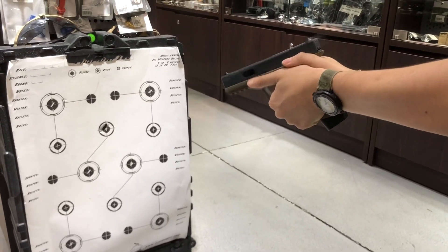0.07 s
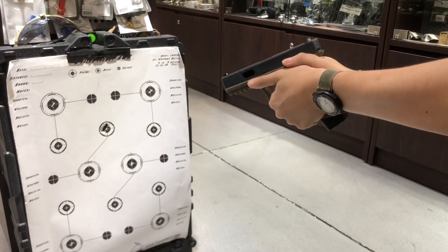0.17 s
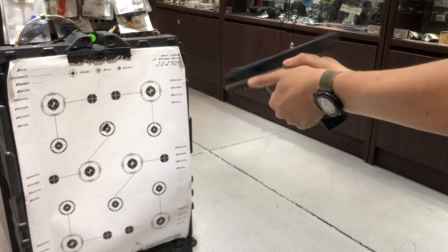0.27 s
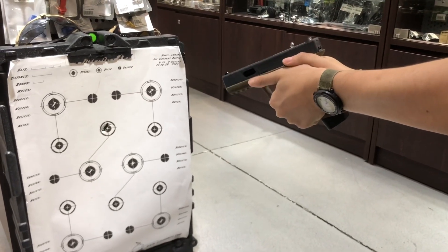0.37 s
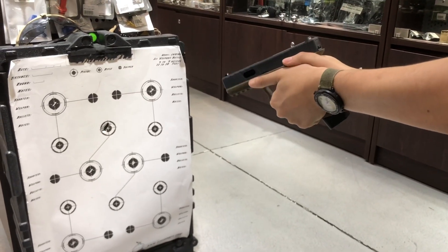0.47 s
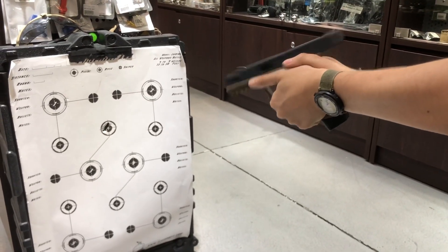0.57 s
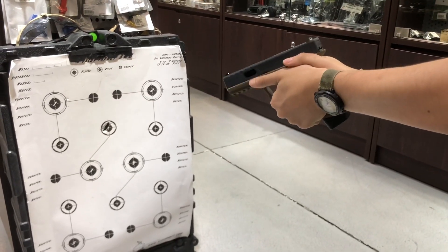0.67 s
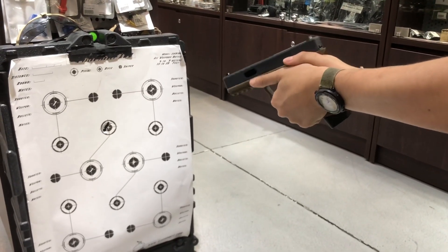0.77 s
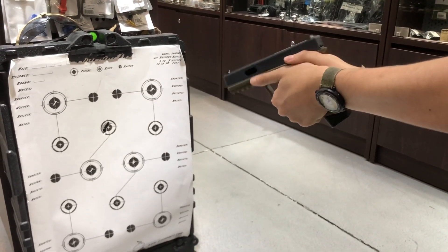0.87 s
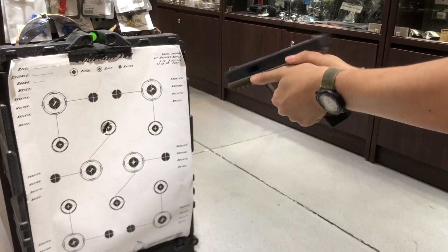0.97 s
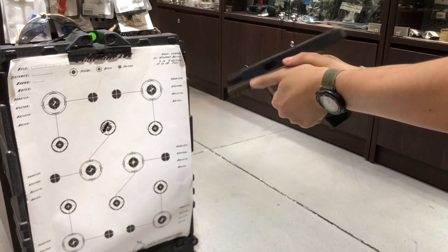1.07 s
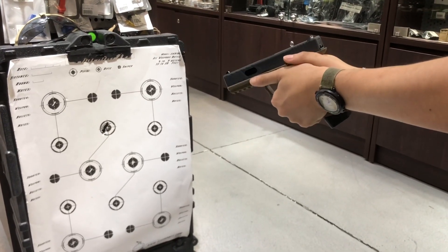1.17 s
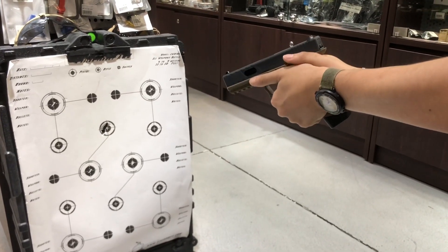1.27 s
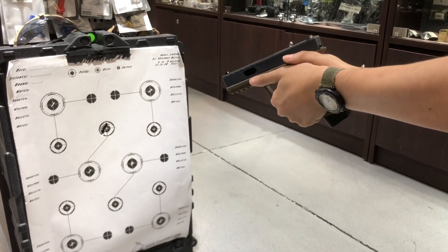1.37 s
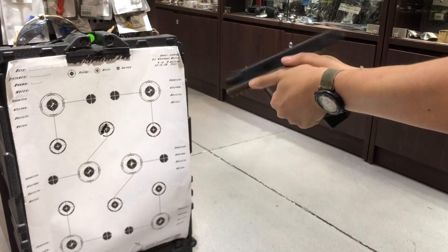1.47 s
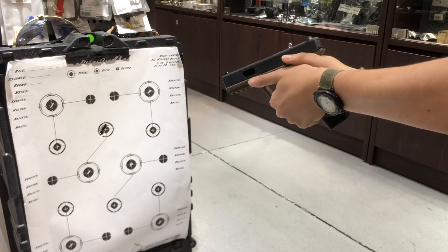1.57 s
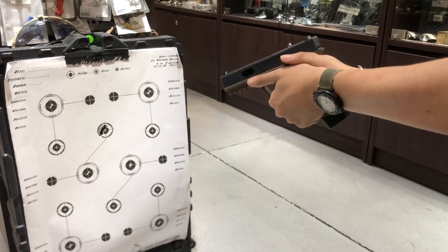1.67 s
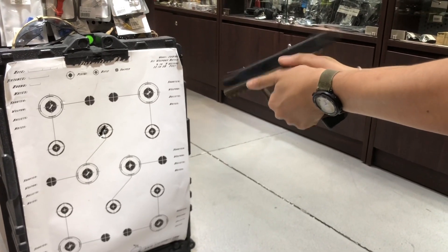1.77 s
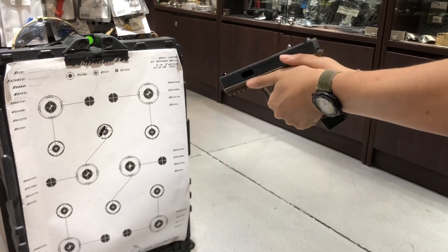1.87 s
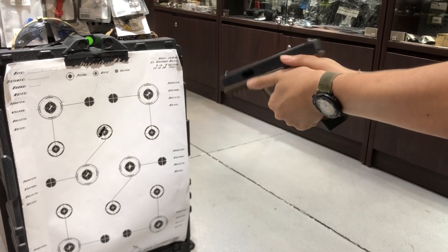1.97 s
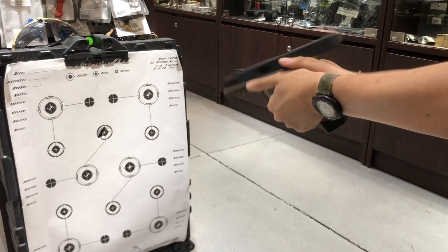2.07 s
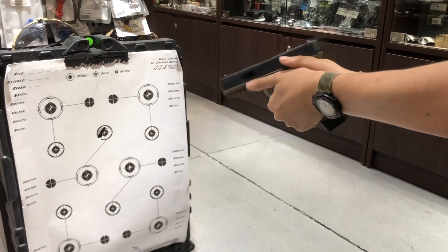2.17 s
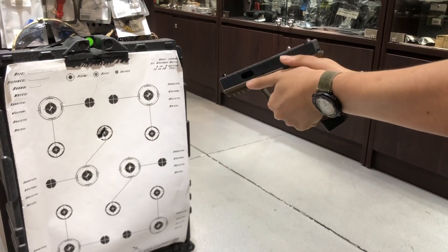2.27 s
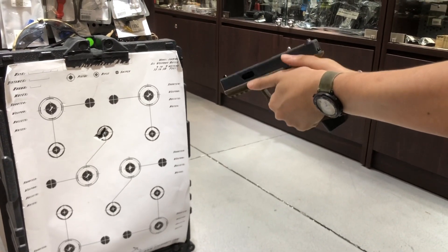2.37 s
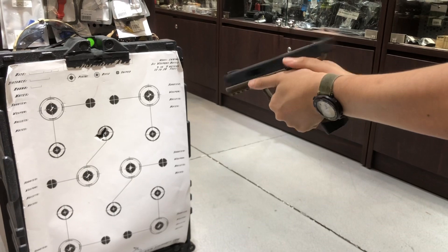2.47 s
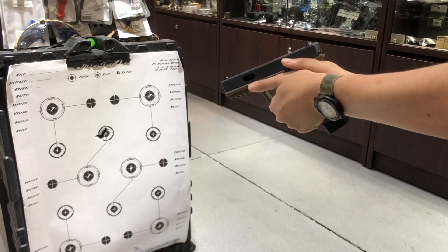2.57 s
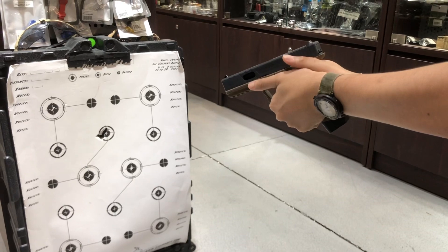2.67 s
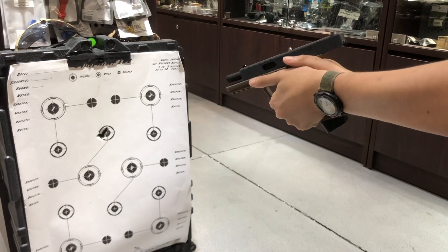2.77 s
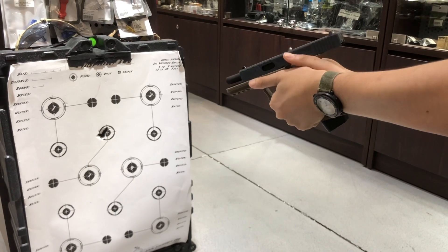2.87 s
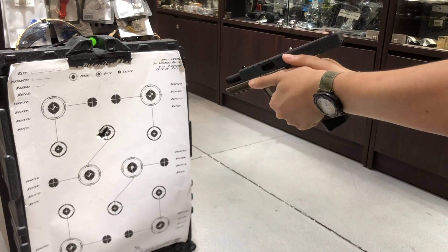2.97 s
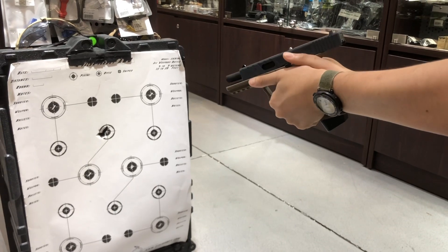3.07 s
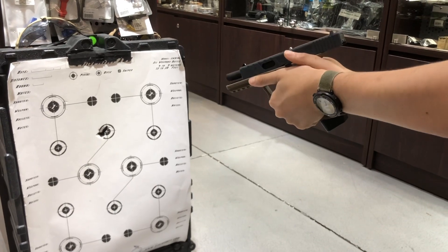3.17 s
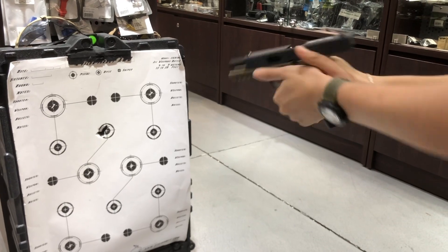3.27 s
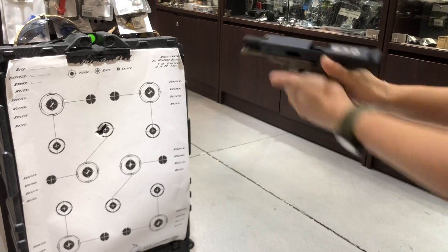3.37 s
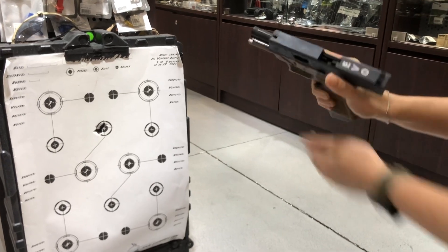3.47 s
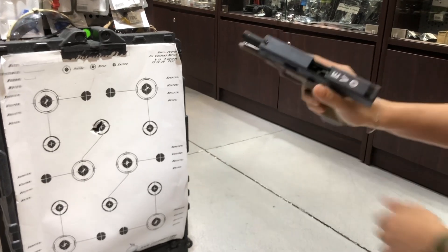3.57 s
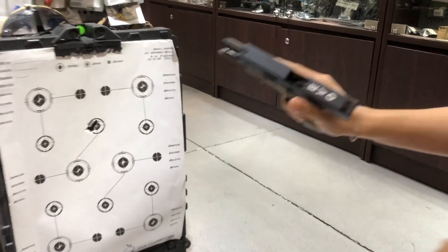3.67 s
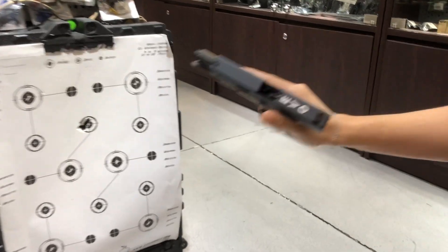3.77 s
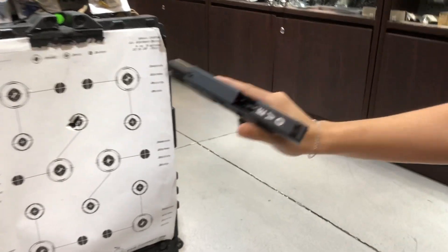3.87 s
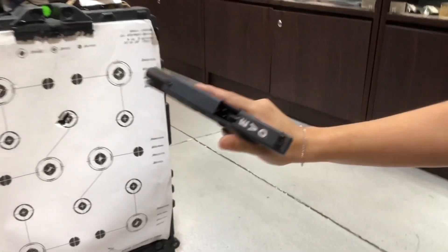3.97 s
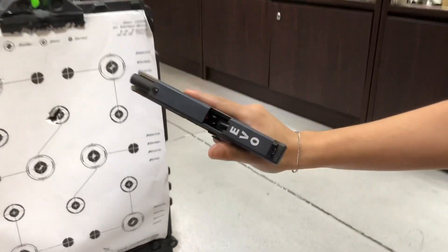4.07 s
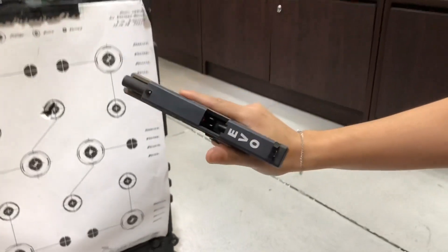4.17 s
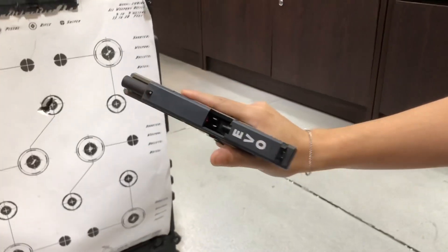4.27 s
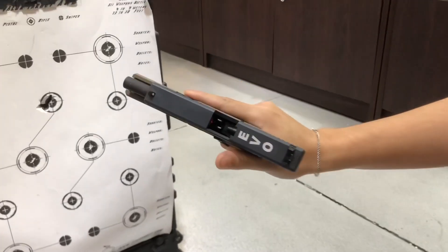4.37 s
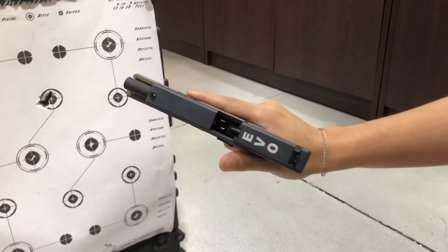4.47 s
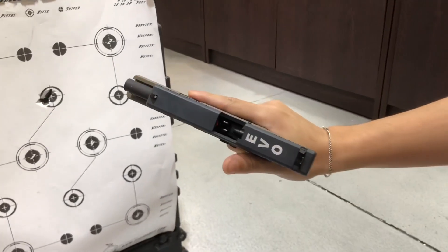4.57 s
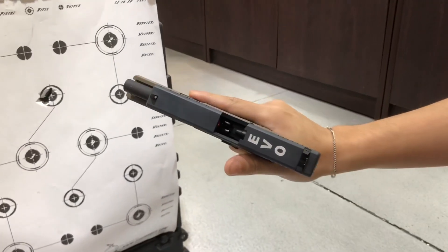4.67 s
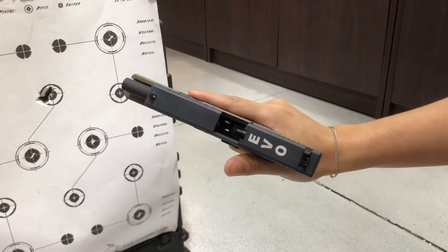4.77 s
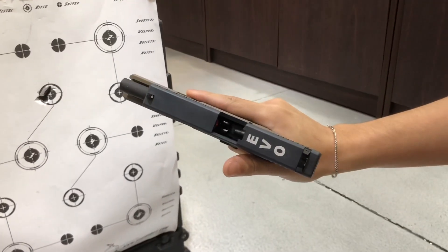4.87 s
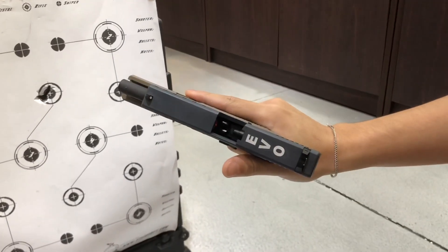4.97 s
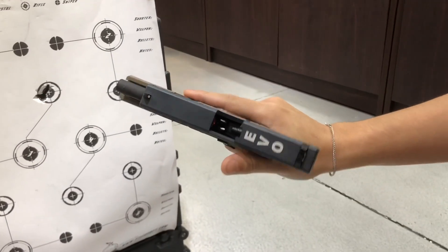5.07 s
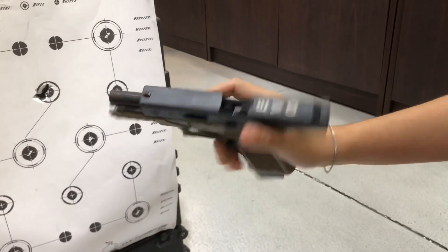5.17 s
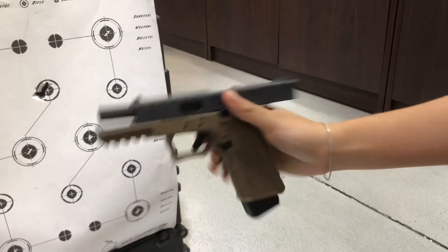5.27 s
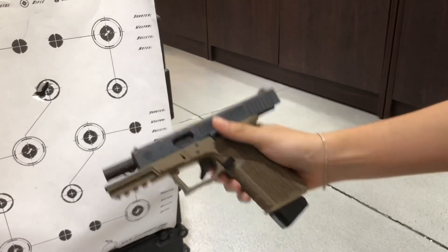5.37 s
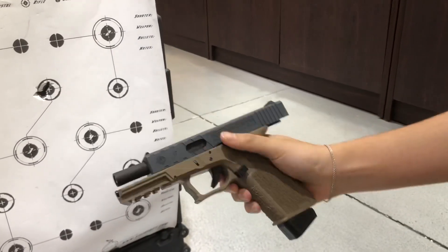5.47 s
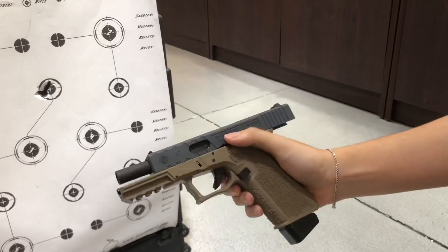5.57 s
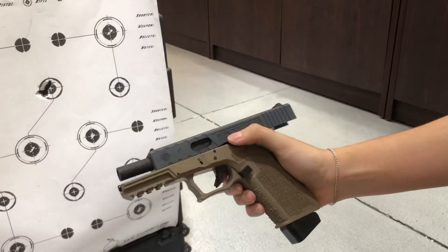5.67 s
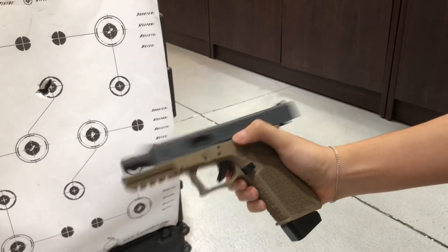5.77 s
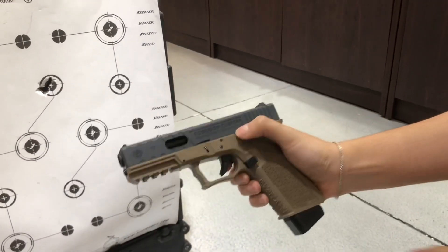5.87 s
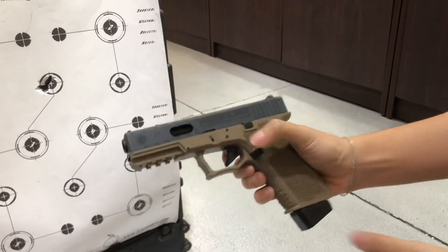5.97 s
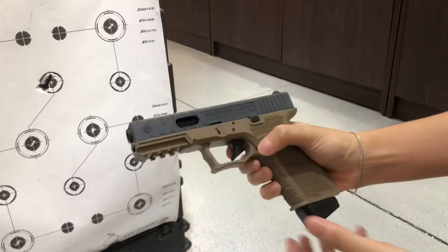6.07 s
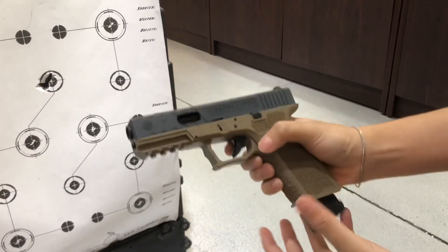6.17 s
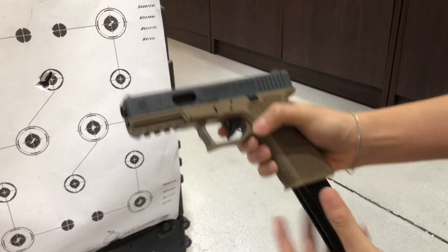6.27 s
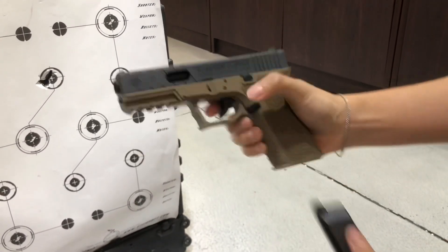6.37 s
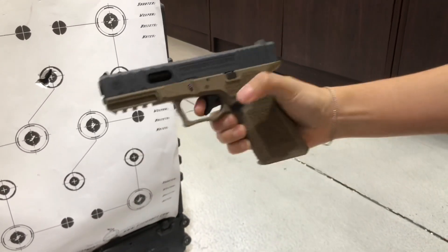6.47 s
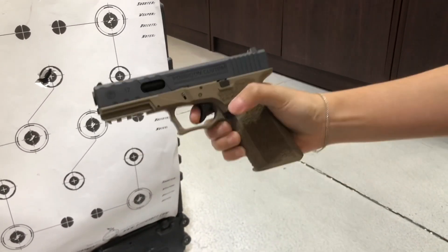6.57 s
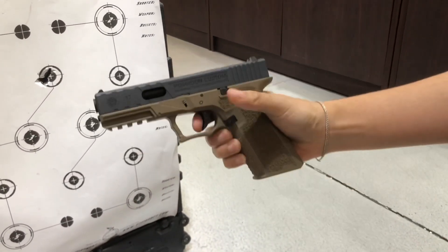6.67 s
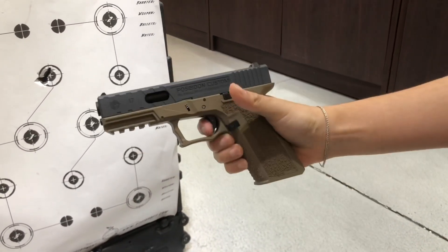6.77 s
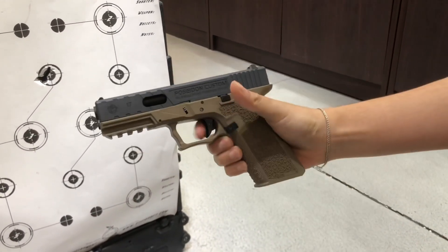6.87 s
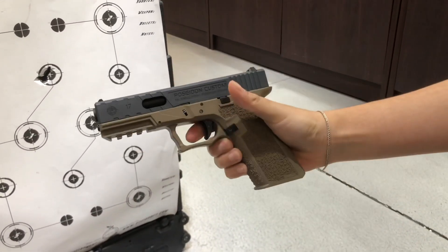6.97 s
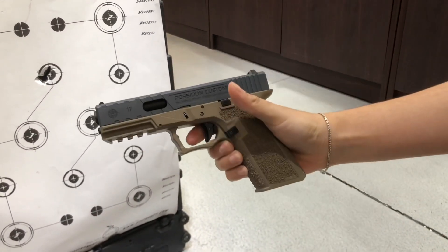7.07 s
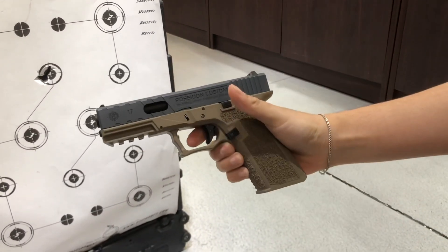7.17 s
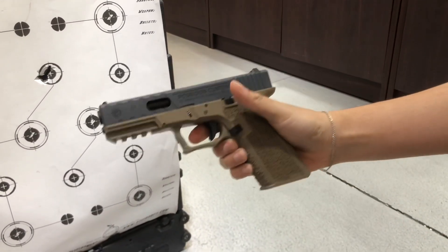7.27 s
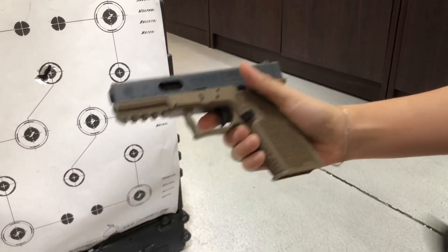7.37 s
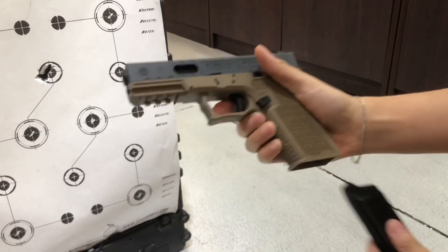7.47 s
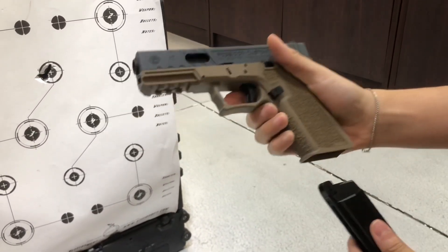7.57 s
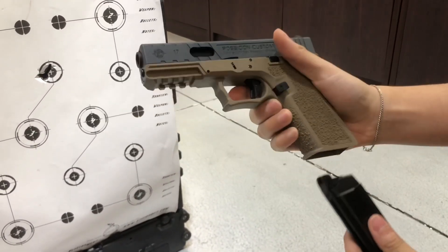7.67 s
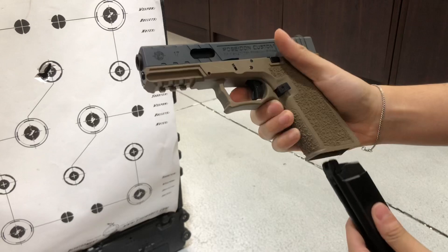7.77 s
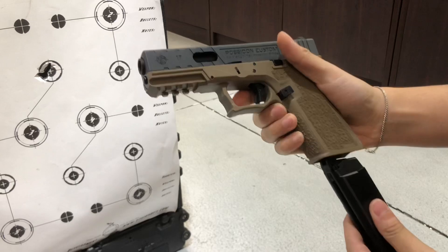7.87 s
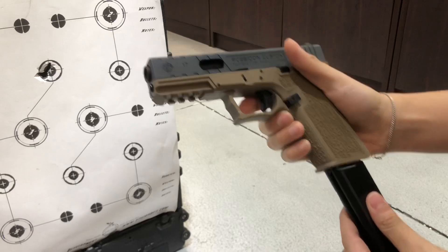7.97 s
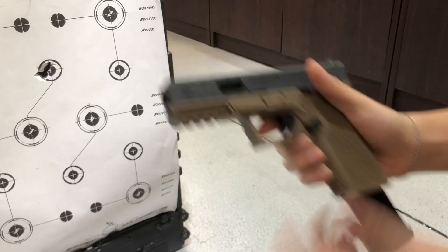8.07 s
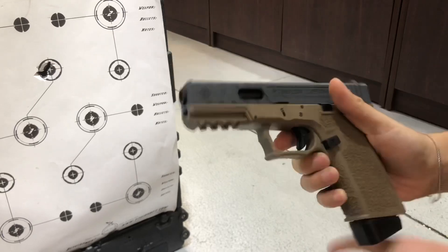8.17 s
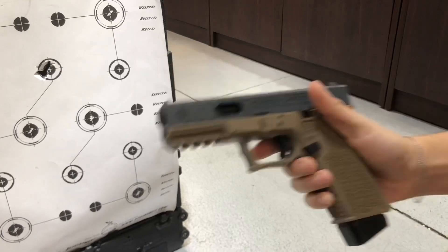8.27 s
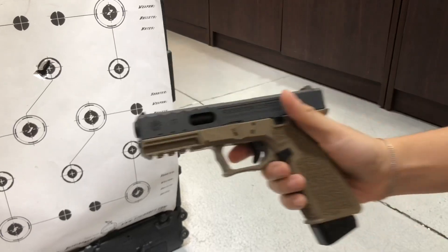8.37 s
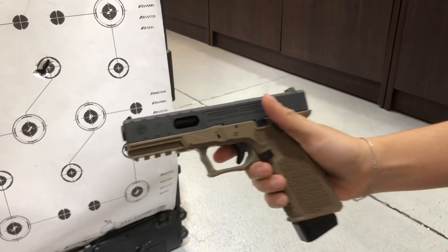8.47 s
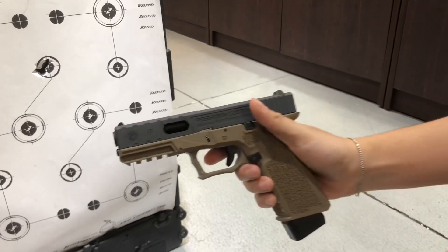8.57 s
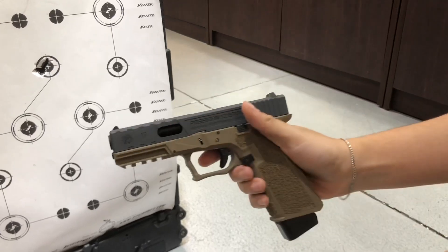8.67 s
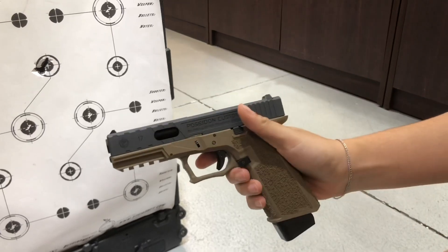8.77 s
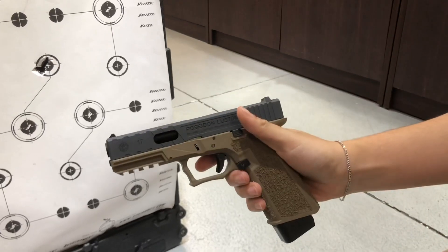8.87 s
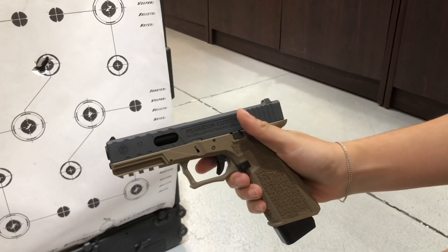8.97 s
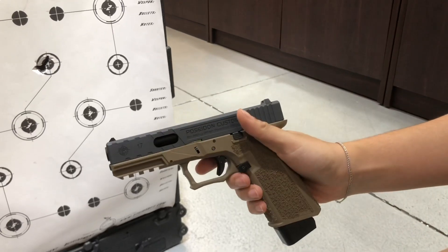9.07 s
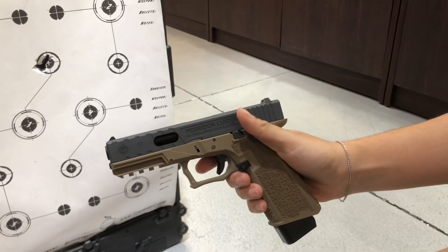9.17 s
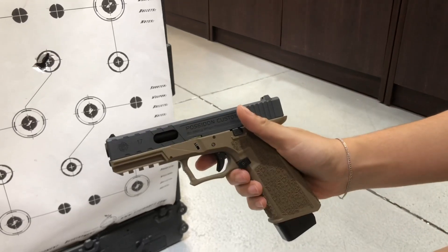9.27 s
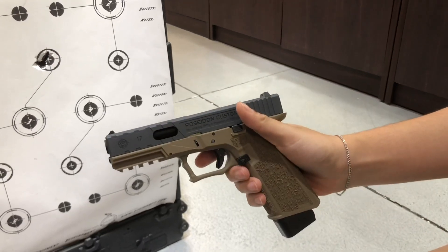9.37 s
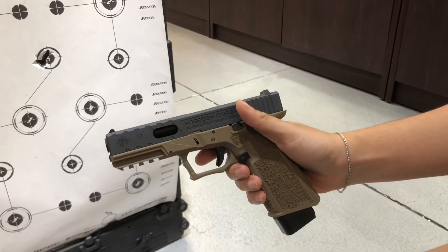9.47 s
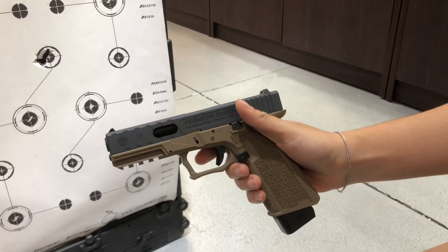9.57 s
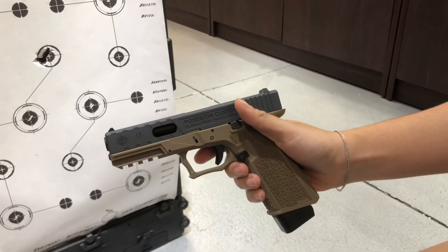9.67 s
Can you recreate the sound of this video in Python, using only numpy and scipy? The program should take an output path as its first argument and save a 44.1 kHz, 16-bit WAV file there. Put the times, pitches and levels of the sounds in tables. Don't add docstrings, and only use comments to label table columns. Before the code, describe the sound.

Very close to a phone microphone in a shop, a gas airsoft pistol fires eighteen rapid, uneven shots, each a crack, pellet knock, metallic slide slap and puff buffeting the microphone. Fan hum returns afterwards. Small clicks lead to a loud slide release, then a magazine drops free and another is pushed in with a double clack.

```python
import sys
import numpy as np
from scipy import signal
from scipy.fft import rfft, irfft, next_fast_len
from scipy.io import wavfile
from scipy.ndimage import uniform_filter1d

SR = 44100
rng = np.random.default_rng(int(sys.argv[2]) if len(sys.argv) > 2 else 0)


def output_pcm(signal):
    pcm = np.clip(np.atleast_2d(signal).T, -1, 1) * 32767
    wavfile.write(sys.argv[1], SR, np.round(pcm).astype(np.int16))


def magnitude_from_level(level_db):
    exponent = np.asarray(level_db, float) / 20
    return 10 ** exponent


N = 429087

# (time [s], strength [dB])
DRAUGHT = [(0, 2), (2.9, -2), (3.6, -1.5), (4.1, 1), (4.8, 1.5), (5.6, 1), (6.6, -1.5), (7.5, -.5),
           (8.4, .5), (9.1, 0), (9.73, 0)]
# (frequency [Hz], density [dB per Hz])
RUMBLE = [(13, -42), (22, -4.5), (32, -3.5), (49, 7), (74, -10), (143, -3.5), (180, -8.5), (261, -0.5),
          (436, -12), (484, -8), (568, -14.5), (666, -9.5), (767, -17.5), (1090, -18.5), (1500, -25),
          (1950, -48.5), (3300, -120)]
# (frequency [Hz], density [dB per Hz])
HISS = [(470, -30), (800, -3.5), (1110, -18.5), (1510, -4.5), (1800, -8), (2490, -5.5), (3860, -14.5),
        (4830, -16.5), (5330, -18), (15800, -30)]
# (frequency [Hz], t60 [s])
SHOP = [(150, 0.51), (1000, 0.29), (5500, 0.27), (10000, 0.22), (15500, 0.17)]
# (frequency [Hz], level sent back [dB])
WALLS = [(300, -5), (1500, 2), (5000, 1.5), (10000, 4), (15400, 6.5)]
# (time [s], length [s], start [Hz], end [Hz], level [dB])
SQUEAKS = [
    (4.865, .12, 1492, 1490, -52),
    (6.397, .05, 6300, 5400, -46),
    (6.45, .07, 6400, 5500, -65),
]
# (time [s], length [s], start level [dB], end level [dB], dullness [dB])
SCRAPES = [
    (1.249, 0.017, -43, -41.5, 7),
    (5.01, 0.047, -39, -46.5, 9.5),
    (5.155, 0.15, -56, -56, 0),
    (6.135, .14, -50, -42, -5),
    (6.682, 0.024, -53, -43, 11),
    (7.972, .093, -58, -29.5, 0),
    (8.25, 0.22, -57.5, -54.5, 1.5),
]
# (time [s], level [dB], dullness [dB], length [s])
CLICKS = [(2.611, -33, 3.5, 0.0048), (2.655, -50, -3.5, 0.005), (2.883, -49.5, 12.5, .0031),
          (3.171, -50.5, 0.5, 0.0057), (3.328, -51, 7, .0033), (3.385, -44.5, 0.5, .005),
          (3.4, -52, 12, .0055), (5.175, -44, 11, 0.0042), (5.212, -42.5, 5, 0.0028),
          (5.228, -40.5, 13, .004), (5.268, -35.5, 5, .012), (5.279, -30.5, 3.5, 0.0037),
          (5.298, -36.5, 8, .0025), (5.354, -38.5, 15.5, .0056), (5.692, -47.5, 3.5, .004),
          (5.72, -54, 5, .0053), (5.877, -34.5, -2, .0051), (6.118, -38.5, 9.5, 0.0038),
          (6.128, -30.5, 5, 0.0044), (6.159, -39, 12, .0032), (6.18, -43.5, 5, .0044),
          (6.28, -46.5, 1.5, .0044), (6.446, -39, 9.5, 0.0049), (6.69, -40, 15, .0034),
          (6.829, -38.5, 8, .0046), (7.91, -37, 8, .0058), (7.958, -33, 8, .0098),
          (7.992, -31, 10.5, 0.0051), (8.02, -32.5, 10, 0.013), (8.975, -51, 5, .0037)]
# (time [s], level [dB], dullness [dB], length [s], echo [dB])
CLACKS = [
    (5.7403, -10, -7, .003, -16),
    (5.7606, -10, -10, .0018, -12),
    (5.7638, -14, 0, .004, -10),
    (5.7683, -14, -12, .0045, -6),
    (6.7068, -22, 4, .003, -9),
    (6.709, -12, 2, .0042, -7),
    (8.0612, -14, -3, .006, -13),
    (8.068, -17, 0, .006, -13),
    (8.0868, -10, -2, .0045, -8),
]
# (time [s], frequency [Hz], level
# [dB], t60 [s])
RINGS = [(2.612, 1300, -38, .1), (5.229, 3500, -29, .04), (5.275, 3100, -29, .03), (5.298, 1900, -31, .025),
         (5.741, 4400, -14, .02), (6.13, 2900, -29, .025), (6.18, 3000, -39, .04), (6.447, 2000, -37, .025),
         (5.354, 1200, -33, .03), (5.764, 2800, -13, .02), (5.7685, 15300, -12, .022),
         (5.786, 15300, -25, .14), (5.785, 9490, -29, .1), (6.709, 1050, -19, .03), (6.709, 1650, -18, .03),
         (6.725, 13800, -28, .04), (7.96, 930, -31, .04), (8.027, 900, -31, .04), (8.04, 750, -36, .05),
         (8.062, 3450, -10, .04), (8.088, 3300, -12, .035), (8.105, 3300, -24, .1), (8.088, 2000, -17, .03),
         (8.125, 2050, -27, .16), (8.152, 3800, -36, .04)]
# (pop time [s], pop level [dB], buffet level [dB])
POPS = [(0.0615, -11.5, -42), (0.2235, -11, -43.5), (0.386, -12, -35.5), (0.525, -0.5, -17),
        (0.6847, -21.5, -26.5), (0.786, -1, -17.5), (0.9054, 0, -11.5), (1.0421, -12.5, -23),
        (1.2732, -6.5, -27), (1.44, -12, -14), (1.5835, 2, -17.5), (1.743, -15, -13.5), (1.8959, -6, -9.5),
        (2.0362, -16.5, -49.5), (2.1531, 4, -13.5), (2.2821, -18.5, -44), (2.4194, -12.5, -25),
        (2.6893, -8, -32.5)]
# (time [s], time until the slide slams shut [s])
SHOTS = [(0.0512, .0453), (0.2165, .0428), (0.3794, .0439), (0.5236, .0441), (0.6742, .0464),
         (0.7833, .0444), (0.903, .0442), (1.0336, .0446), (1.2735, .045), (1.4387, .0451), (1.5813, .0459),
         (1.7404, .0452), (1.8936, .0451), (2.0215, .0475), (2.152, .0458), (2.2688, .0475), (2.4068, .046),
         (2.6778, .0462)]
# (frequency [Hz], density [dB per Hz])
CRACK = [(180, -49), (300, -7.5), (759, -14), (1230, -7.5), (1660, -8), (3380, -7.5), (4260, -3.5),
         (6040, -2), (6450, 1.5), (7740, -10.5), (8550, -10), (9290, -7.5), (15800, -23.5)]
# (frequency [Hz], density [dB per Hz])
STOP = [(180, -21.5), (300, -3.5), (1020, -2.5), (1400, 0.5), (2680, -8), (3670, -9.5), (5840, -5),
        (7250, -8), (9610, -6), (15800, -4.5)]
# (frequency [Hz], density [dB per Hz])
SLAM = [(600, -24), (1800, -8), (3100, -4.5), (4100, 0.5), (5000, -2.5), (8500, -4), (11500, -6),
        (14000, -3.5), (15900, -4.5)]
# (frequency [Hz], density [dB per Hz])
VENT = [(71, -39), (120, -6.5), (471, -0.5), (1130, -3), (1340, -4.5), (3080, -1), (3350, -4.5),
        (5350, 1.5), (6700, -7), (10900, -7), (15800, -15)]
# (frequency [Hz], level [dB], t60 [s])
BOX = [(155, -4, .08), (245.8, -3, 0.27), (407, -3.5, 0.33), (534, 0.5, 0.19), (918, 1, 0.11),
       (1090, 4, 0.11), (1580, -7.5, .05), (1683, -1.5, 0.25)]
# (frequency [Hz], level [dB], t60 [s])
SLIDE = [(1022, -19, .09), (1520, -5.5, 0.094), (4130, 10.5, 0.075), (5640, 3, 0.055), (6450, -1.5, 0.12),
         (8800, 5.5, .09), (9800, -5, .1), (15350, -9, .1)]
CLACK_DUCK_S = [5.74, 6.707, 8.06]
CLACK_DUCK_DB = [5.5, 1.5, 1]

RUMBLE_DB, HISS_DB = -42.5, -53
HISS_FOLLOWS = 0.98
WALL_GAP_S = .0155
EARLIER_S, EARLIER_DB, EARLIER_T60_S = -.11, -36.5, .3
SHOT_DUCK_DB, RECOVER_S = 11.5, 0.5
ROUGH_PER_GLIDE = 5.2
SCRAPE_GRAIN_DB = 3
CLICK_ECHO_DB = -12
CLICK_HIGH_DB, CLICK_HIGH_PER_DULL = -3, 1.1
CLACK_HIGH_DB, CLACK_HIGH_PER_DULL = -3, 0.18
HARD_RISE_S, SOFT_RISE_S = .0003, .0015
CRACK_DB, STOP_DB, SLAM_DB = -3.5, -8.5, -4.5
SCATTER_DB = 0.9
BOX_BLUR, SLIDE_BLUR = .04, .2
RETURN_S = .029
LOCK_S, LOCK_DB = 0.048, -26.5
TOP_HZ = 15750


def unit(x):
    return x / np.sqrt(np.mean(x ** 2) + 1e-20)


def along(points, hz):
    f, v = np.transpose(points)
    return np.interp(np.log(hz + 1), np.log(f + 1), v)


def noise(size, spectrum, spiky_db=0., clump=8):
    m = next_fast_len(size + 512)
    unevenness = np.repeat(rng.standard_normal(m), round(clump))[:m]
    hail = rng.standard_normal(m) * magnitude_from_level(spiky_db * unevenness)
    colour = magnitude_from_level(along(spectrum, np.fft.rfftfreq(m, 1 / SR)))
    return unit(irfft(rfft(hail) * colour, m)[:size])


def add(track, s, sound):
    part = track[max(round(s * SR), 0):][:len(sound)]
    part += sound[:len(part)]


def burst(spectrum, rise, hold, t60, spiky_db):
    t = np.arange(SR // 8) / SR
    swell = np.minimum(t / abs(rise), 1) ** 2
    decay = magnitude_from_level(-60 * np.maximum(t - abs(rise) - abs(hold), 0) / abs(t60))
    shape = swell * decay
    sound = shape * noise(len(t), spectrum, spiky_db)
    return sound * np.linalg.norm(shape) / np.linalg.norm(sound)


def pulse(spectrum, size=256):
    click = np.fft.fftshift(irfft(magnitude_from_level(along(spectrum, np.fft.rfftfreq(size, 1 / SR))), size))
    return click / np.linalg.norm(click)


def ring(modes, blur):
    t = np.arange(SR // 6) / SR
    out = np.zeros(len(t))
    for hz, db, t60 in modes:
        decay = magnitude_from_level(db + rng.normal(0, 2.7) - 60 * t / t60)
        drift = blur * np.cumsum(rng.standard_normal(len(t)))
        out += decay * np.sin(2 * np.pi * hz * t + drift)
    return out


def ventilation():
    t = np.arange(N) / SR
    draught_db = np.interp(t, *np.transpose(DRAUGHT))

    def slow(top_hz):
        return noise(N, [(.3, 0), (top_hz, -6), (4 * top_hz, -40), (100, -90)])

    hum = magnitude_from_level(-12 + 1.8 * slow(1.5)) * np.sin(2 * np.pi * 37.0 * t + 1.2 * slow(3))
    rumble = unit(magnitude_from_level(0.66 * slow(5.8)) * noise(N, RUMBLE)) + hum
    z = signal.stft(noise(N, HISS), nperseg=512)[2]
    patches = uniform_filter1d(rng.standard_normal(z.shape), 5, 0)
    patches = uniform_filter1d(patches, 16, 1)
    hiss = unit(signal.istft(z * magnitude_from_level(1.5 * unit(patches)), nperseg=512)[1][:N])
    return magnitude_from_level(RUMBLE_DB + draught_db) * rumble + magnitude_from_level(HISS_DB - 2 + HISS_FOLLOWS * draught_db) * hiss


def ducking():
    blows = [(s, SHOT_DUCK_DB) for s in [EARLIER_S] + [shot[0] for shot in SHOTS]]
    blows += list(zip(CLACK_DUCK_S, CLACK_DUCK_DB))
    t = np.arange(N) / SR
    gain_db = np.zeros(N)
    for s, db in blows:
        gain_db = np.minimum(gain_db, -db * np.exp(-np.abs(t - s) / RECOVER_S) * (t > s))
    return uniform_filter1d(gain_db, size=SR // 50)


def earlier_shot():
    t = np.arange(N) / SR
    return magnitude_from_level(EARLIER_DB - 60 * t / EARLIER_T60_S) * noise(N, STOP)


def shop(x, slap=1.2, swell=.002):
    out, step = np.zeros(N), SR // 10
    for i in range(0, N, step):
        hz, t, z = signal.stft(rng.standard_normal(SR // 3), SR, nperseg=256)
        decay_db = along(WALLS, hz)[:, None] - 60 * t / along(SHOP, hz)[:, None]
        tail = signal.istft(z * magnitude_from_level(decay_db), SR, nperseg=256)[1]
        t = np.arange(len(tail)) / SR
        tail = tail * np.minimum(t / swell, 1) * (1 + slap * np.exp(-t / .004))
        add(out, i / SR + WALL_GAP_S, signal.fftconvolve(x[i:i + step], tail / np.linalg.norm(tail)))
    return out


def squeaks():
    out = np.zeros(N)
    for s, length, start_hz, end_hz, db in SQUEAKS:
        rough = ROUGH_PER_GLIDE * (start_hz / end_hz - 1)
        octave_db = 29 * rough - 40
        u = np.arange(round(length * SR)) / (length * SR)
        pitch_hz = end_hz + (start_hz - end_hz) * np.exp(-9 * u)
        phase = 2 * np.pi * np.cumsum(pitch_hz) / SR
        phase = phase + 0.16 * rough * np.cumsum(rng.standard_normal(len(u)))
        flutter = magnitude_from_level(3 * noise(len(u), [(20, 0), (150, 0), (400, -40)]))
        envelope = magnitude_from_level(db + 2 - 6 * u) * np.sin(np.pi * u) ** 0.17
        tone = np.sin(phase) + magnitude_from_level(octave_db) * np.sin(2 * phase)
        add(out, s, envelope * flutter * tone)
    return out


def tilted(low_db, high_db):
    return [(560, low_db - 36.0), (1000, low_db - .6), (2200, low_db + 3.5), (3500, 1.5),
            (8000, -2.2), (12000, high_db - .6), (15400, high_db - 1.0)]


def handling():
    near, far = np.zeros(N), np.zeros(N)
    soft = [(*row, CLICK_ECHO_DB, CLICK_HIGH_DB - CLICK_HIGH_PER_DULL * row[2]) for row in CLICKS]
    hard = [(*row, CLACK_HIGH_DB - CLACK_HIGH_PER_DULL * row[2]) for row in CLACKS]
    for s, db, low_db, length, echo_db, high_db in soft + hard:
        colour = tilted(low_db, high_db)
        rise = HARD_RISE_S if db > -25 else SOFT_RISE_S
        contact = burst(colour, rise, .55 * length, 4 * length, spiky_db=3)
        chatter = burst(colour, 0.0025, 0.0046, 0.08, spiky_db=1.0)
        add(near, s, magnitude_from_level(db + 2.5) * contact)
        add(near, s, magnitude_from_level(db - 13.0) * chatter)
        add(far, s + length - .004, magnitude_from_level(db + echo_db) * np.sqrt(length * SR) * pulse(colour))
    for s, hz, db, t60 in RINGS:
        add(near, s, ring([(hz, db, t60)], blur=.12))
    for s, length, start_db, end_db, low_db in SCRAPES:
        u = np.linspace(0, 1, round(length * SR))
        edge = np.abs(np.sin(np.pi * u)) ** .3
        grains = noise(len(u), tilted(low_db, -7), spiky_db=SCRAPE_GRAIN_DB, clump=71)
        add(near, s, edge * magnitude_from_level(start_db + (end_db - start_db) * u) * grains)
    return near, far


def pops():
    out, t = np.zeros(N), np.arange(1, SR // 12) / SR
    for (s, pop_db, buffet_db), shot in zip(POPS, SHOTS):
        u = t / .0024
        pop = u ** 4 * np.exp(3.6 * (1 - u)) * np.cos(8.3 * np.log(u) - .15)
        add(out, s - .0024, magnitude_from_level(pop_db - 4.0) * pop)
        u = t / 0.013
        turns = 52 * t + 1.2 * (1 - np.exp(-t / 0.0053)) + rng.normal(0.17, 0.97)
        buffet = u ** 1.4 * np.exp(-1.7 * u) * np.cos(2 * np.pi * turns)
        add(out, shot[0] + 0.006, magnitude_from_level(buffet_db + 15.5) * buffet)
    return out


def pistol():
    out = np.zeros(N)
    for (s, shut), chance in zip(SHOTS, rng.standard_normal((len(SHOTS), 3))):
        crack_db, stop_db, slam_db = np.array([CRACK_DB, STOP_DB, SLAM_DB]) + SCATTER_DB * chance
        back = shut - RETURN_S
        if s == SHOTS[-1][0]:
            shut, slam_db = LOCK_S, LOCK_DB
        hammer = burst(VENT, .006, .001, .01, spiky_db=3)
        crack = burst(CRACK, .0045, .0035, .012, spiky_db=4.5)
        pellet = burst(STOP, .0004, .0006, .012, spiky_db=3)
        stop = burst(STOP, .001, .0015, .03, spiky_db=3.5)
        vent = burst(VENT, 0.0046, shut - .013, 0.07, spiky_db=3.5)
        slam = burst(SLAM, .0002, .0008, .02, spiky_db=3.5)
        add(out, s - .011, magnitude_from_level(crack_db - 31) * hammer)
        add(out, s - .0058, magnitude_from_level(crack_db - 5.5) * crack)
        add(out, s + 0.0066, magnitude_from_level(crack_db - 13.5) * pellet)
        add(out, s + 0.0096, magnitude_from_level(crack_db - 24.5) * ring(BOX, blur=BOX_BLUR))
        add(out, s + back - .0015, magnitude_from_level(stop_db - 2) * stop)
        add(out, s + 0.0049, magnitude_from_level(STOP_DB - 11.0) * vent)
        add(out, s + shut, magnitude_from_level(slam_db - 2.5) * slam)
        add(out, s + shut, magnitude_from_level(slam_db - 26.0) * ring(SLIDE, blur=SLIDE_BLUR))
    return out


def scene():
    gun, squeal = pistol(), squeaks()
    near, far = handling()
    room = shop(magnitude_from_level(-6) * gun + magnitude_from_level(4.5) * far + magnitude_from_level(-17) * squeal) + earlier_shot()
    background = magnitude_from_level(ducking()) * ventilation()
    return (gun + near + pops() + squeal + room + background)[None]


def top_cut(x):
    return signal.sosfilt(signal.butter(12, 16830, fs=SR, output="sos"), x)


def record(dry):
    m = next_fast_len(N)
    hz = np.fft.rfftfreq(m, 1 / SR)
    bass_cut = (1j * hz / 36 / (1 + 1j * hz / 36)) ** 2
    port = 1 + .8 / (1 + ((hz - 15380) / 330) ** 2)
    x = irfft(rfft(dry, m) * bass_cut * port, m)
    x = x / (1 + np.abs(x / .98) ** 4) ** (1 / 4)
    skirt = magnitude_from_level(-31.0) + 1 / (1 + np.exp(np.minimum((hz - TOP_HZ) / 60, 50)))
    mix = np.clip(irfft(rfft(x) * skirt, m)[:, :N], -1, 1)
    return top_cut(mix)


dry = scene()
out = record(dry)
output_pcm(out)
```